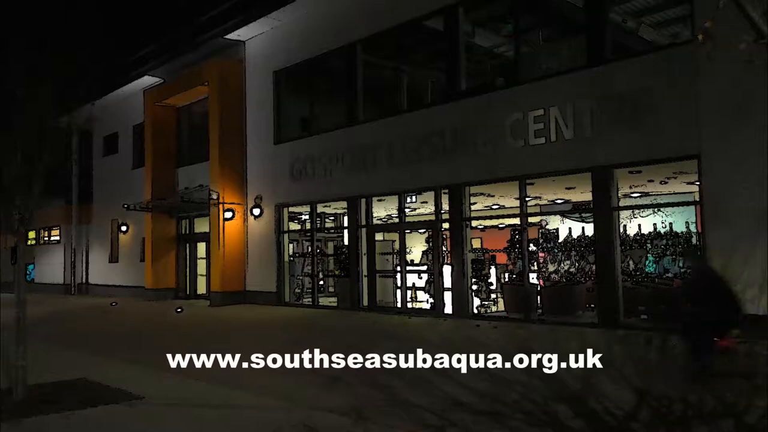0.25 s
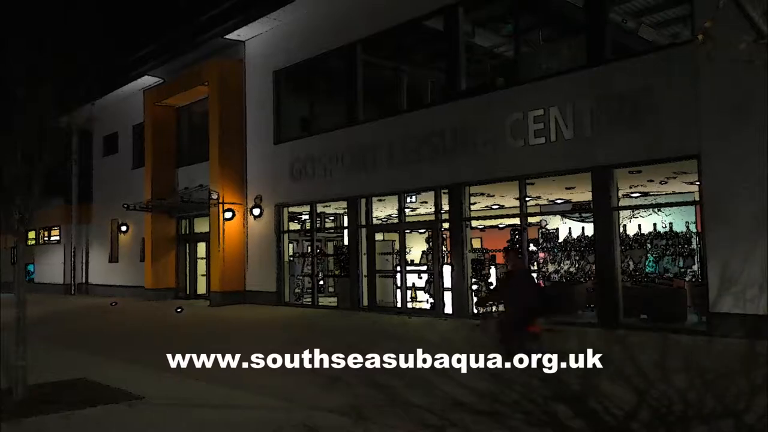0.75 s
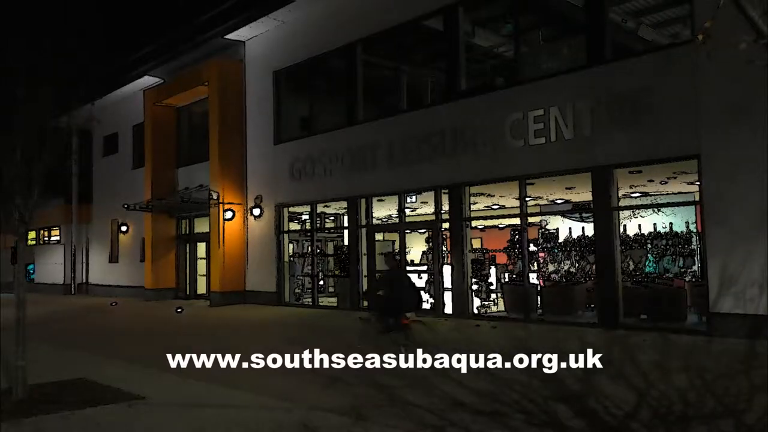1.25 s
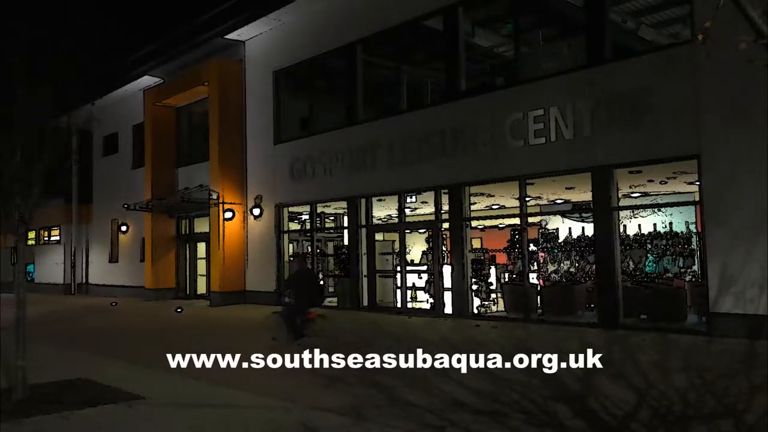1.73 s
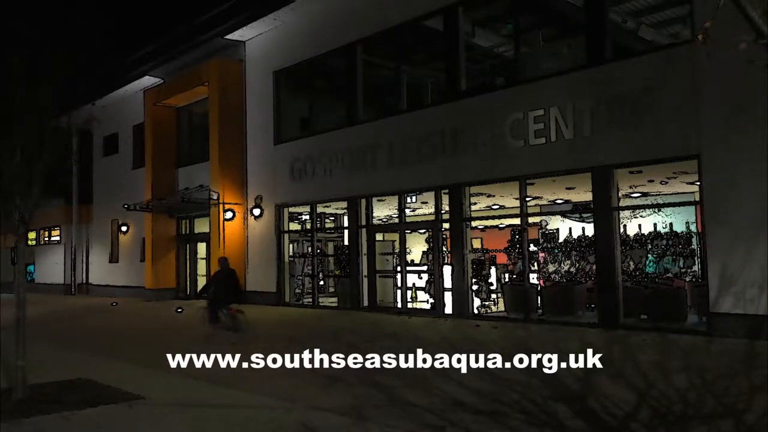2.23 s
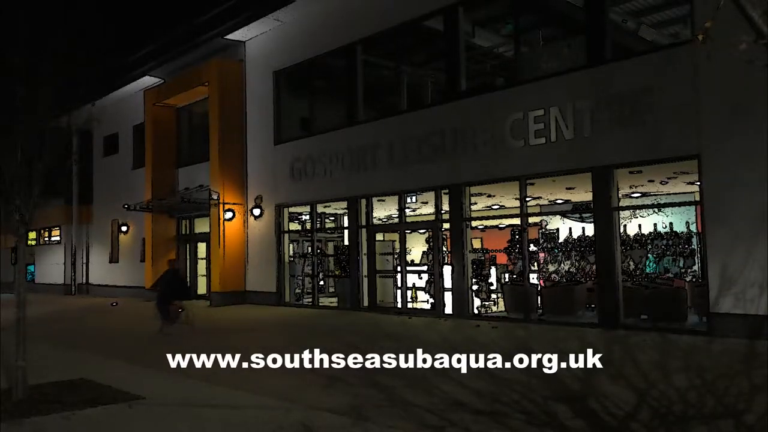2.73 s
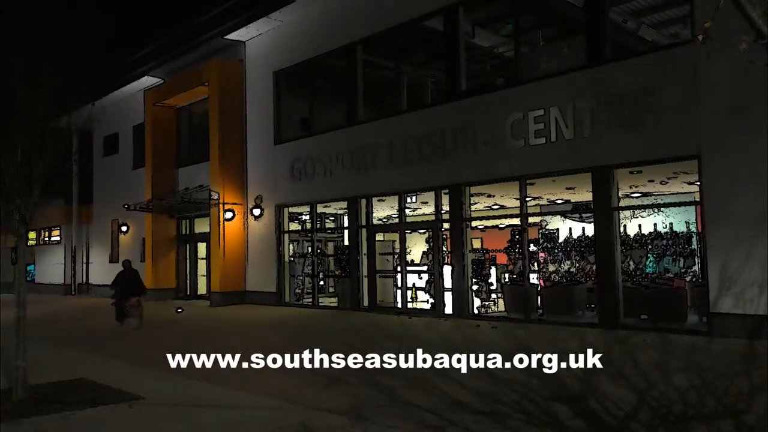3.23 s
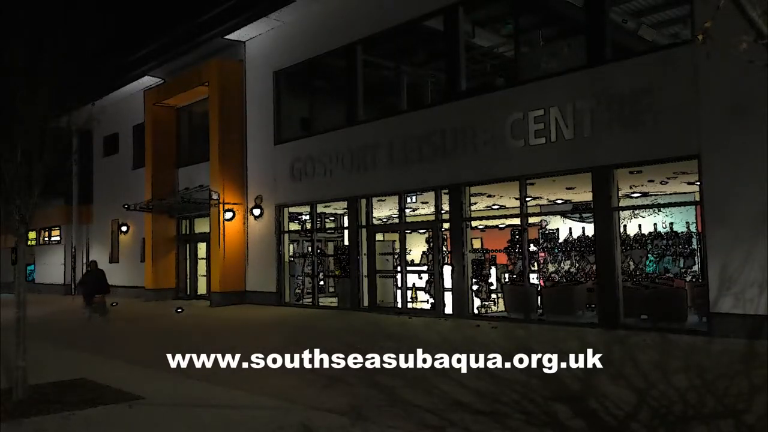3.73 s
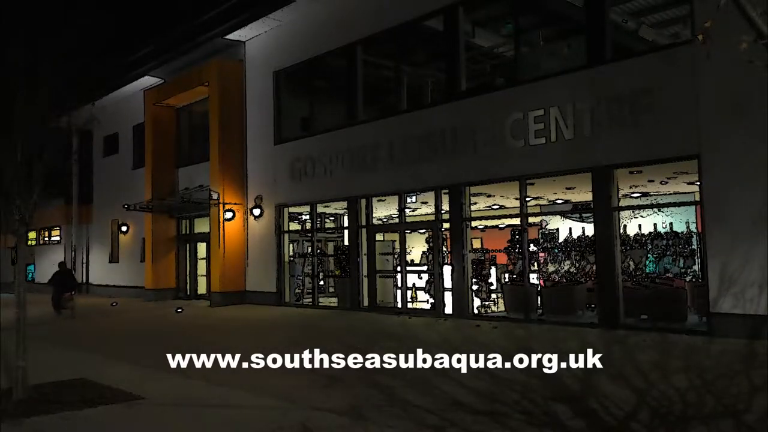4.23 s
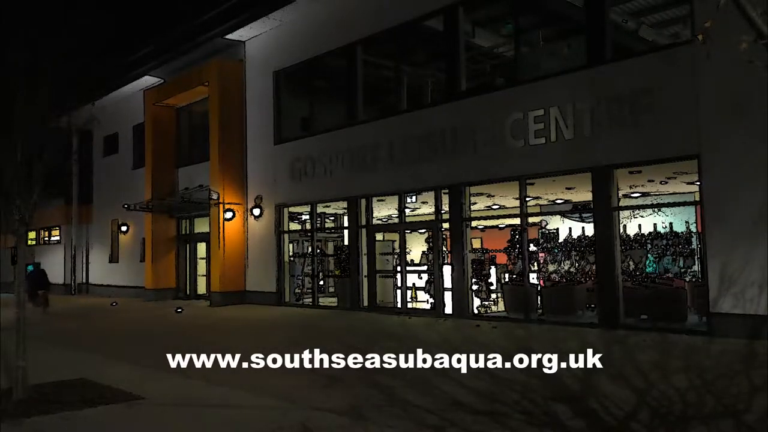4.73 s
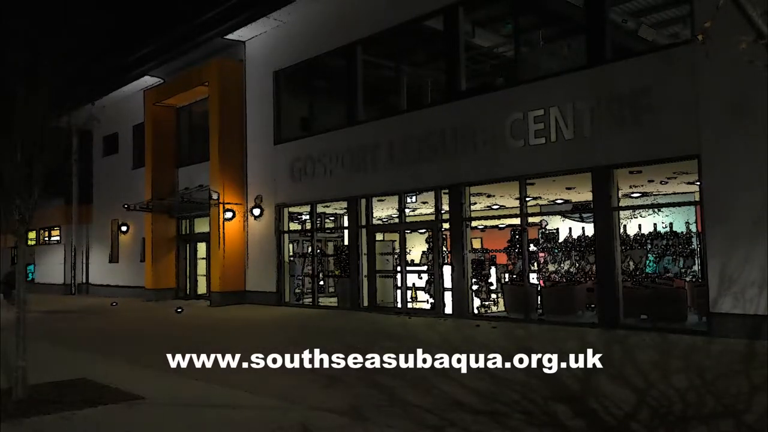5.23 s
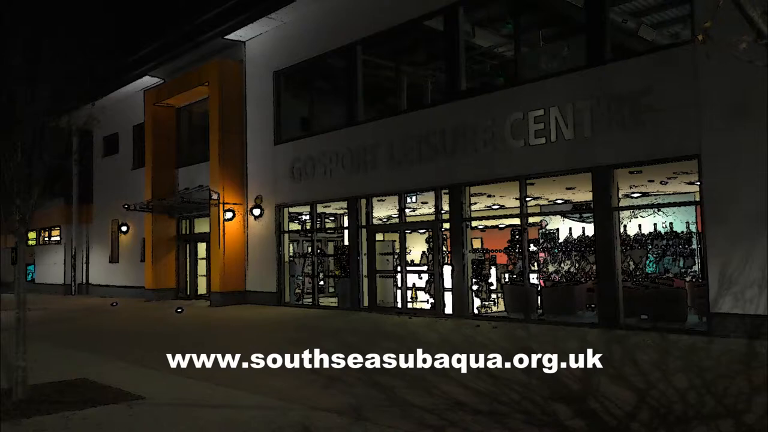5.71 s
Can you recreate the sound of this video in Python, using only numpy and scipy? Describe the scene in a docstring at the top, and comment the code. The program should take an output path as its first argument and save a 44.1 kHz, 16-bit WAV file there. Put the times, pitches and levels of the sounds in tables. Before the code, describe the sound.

A stationary stereo microphone hears a low, broad wash of far road noise and light breeze. A bicycle goes by several metres away, its brakes giving thin whistling squeals at the start, sharp chirps around one and a half seconds, and a fluttering cluster near three. Fainter squeaks and freewheel clicks follow, then a small tick and soft rub, with short reflections from the building.

```python
"""Bicycle passing on a forecourt at night

A bicycle rolls past and away on paving beside a building. Its tyres hiss as shaped noise, its freewheel
ticks as a train of ringing impulses, and its dragging brakes squeal as wavering sines and judder; discrete
echoes and a scattered tail stand for the facade. A distant road, a light breeze and night air are stereo
noises with their own spectra. Near the end comes one short, bright swish of noise."""
import sys
import numpy as np
from scipy import signal
from scipy.fft import rfft, irfft, next_fast_len
from scipy.io import wavfile

SR = 44100
rng = np.random.default_rng(int(sys.argv[2]) if len(sys.argv) > 2 else 0)


def generate_wav(signal):
    """Clip the signal to [-1, 1] and save it as 16-bit WAV at the path in sys.argv[1]."""
    frames = np.transpose(np.atleast_2d(signal))
    scaled = np.clip(frames, -1, 1) * 32767
    pcm = np.round(scaled).astype(np.int16)
    wavfile.write(sys.argv[1], SR, pcm)


N = 263277
TIME = np.arange(N) / SR

# Brake squeals: t/s, hold/s, f/Hz, level/dB, initial flatness/Hz (negative: sharp), left minus right/dB
SQUEALS = [(0, .06, 12120, -60, -7, 0), (0, 0.064, 13900, -60, 0, 0), (0.024, .23, 10690, -54.5, -3, 0),
           (.1, .08, 7760, -69, -5, 3), (.37, .26, 10600, -50, -3, 0), (.415, .22, 7760, -59.5, 0, 4),
           (.405, .05, 2790, -60, 1, 7), (.48, .19, 2830, -58.5, -3, 4), (1.565, 0.033, 8670, -43, 5, -4.5),
           (1.632, 0.042, 8540, -38.5, -2, -3), (1.675, 0.085, 8640, -49, -0.5, -3),
           (1.905, .19, 9320, -70.5, 1, 2), (2.26, 0.021, 9360, -55, -9, -1),
           (2.538, 0.032, 14460, -50, 0, -4.5), (2.545, 0.031, 15730, -56, 0, -4.5),
           (2.622, 0.12, 11860, -43, 0.5, 0.5), (2.765, 0.031, 11880, -50, 0, -1),
           (2.752, 0.026, 3400, -64.5, -5, 4), (2.77, 0.028, 4230, -61.5, -6, 0),
           (2.772, 0.1, 7950, -64.5, 500, 5), (2.875, 0.059, 8600, -60.5, 2, -2),
           (2.91, 0.039, 6420, -61, 0, 0), (2.985, .04, 8450, -62, 3, 2), (2.985, 0.027, 6280, -67, 0, 0),
           (3.08, 0.018, 5780, -68, 2, 0), (3.1, 0.023, 9300, -69, 0, 0), (2.755, .19, 13860, -63, -3, 1),
           (2.945, 0.23, 13780, -59.5, -3, -2), (2.965, 0.34, 15620, -70, 0, -3),
           (3.135, 0.089, 11890, -56, -4, 1), (3.194, 0.062, 11870, -44, -4, -2),
           (3.35, 0.058, 11905, -45, 3, 0), (3.205, 0.023, 5980, -68, 5, 0),
           (3.205, 0.13, 15300, -60, 2, -3), (3.255, 0.11, 13700, -54, -2, -1),
           (3.3, .07, 14230, -57, 0, -1), (4.288, .38, 9060, -53.5, 600, -4.5),
           (4.49, 0.12, 10100, -80, 3, -5), (4.63, 0.034, 8720, -68.5, -6, -4),
           (4.695, 0.036, 8700, -69, 0, -5), (4.85, 0.092, 10730, -73.5, -2, -1),
           (5.038, 0.088, 8780, -66.5, -3.5, -5), (5.105, .08, 9600, -61.5, 902, -4),
           (5.155, 0.19, 10170, -63, 2, -5), (5.32, .09, 10400, -73, 0, -5)]
# Flurries of chirps as the pad skips: t/s, length/s, lowest f/Hz, highest f/Hz, rate/s^-1, level/dB
FLURRIES = [(2.779, 0.23, 5590, 9600, 85, -65), (2.8, .62, 13800, 15800, 60, -71)]
# Spectrum of the bicycle's tyre hiss: f/Hz, relative density/dB
TYRE_HISS_SPECTRUM = [(600, -9.5), (1400, -4), (1800, 1), (2150, 2), (2550, -5.5), (2950, -7), (3500, -7.5),
                      (4500, -13), (5100, -18.5), (6200, -13), (7800, -20.5), (10300, -18), (15500, -42)]
# Small sharp ticks: t/s, level/dB, centre f/Hz
TICKS = [(.24, -40, 9000), (.485, -39, 14000), (.712, -45, 7000), (1.859, -39, 4180), (5.731, -45, 8000)]
# Reflections from paving and facade, relative to the direct sound: delay t/s, level/dB
ECHOES = [(.0043, -19), (.023, -7.5), (.037, -14.5)]
# The swish, a quick stroke within a soft, longer rub: t/s, half width/s, level/dB
SWISH_STROKES = [(5.686, 0.013, -57.5), (5.705, 0.059, -64)]
# Spectrum of the swish: f/Hz, relative density/dB
SWISH_SPECTRUM = [(2000, -8), (4000, -5), (6000, -6), (8000, -4), (11000, 2), (14000, 2), (16000, -2)]
# Distant road, before the layer gains below: t/s, engine rumble level/dB, tyre roar level/dB
ROAD_LEVELS = [(0.0, -52.5, -50.5), (1.0, -51.5, -52), (1.76, -53.5, -51), (2.28, -54.5, -55),
               (3.22, -56.5, -55.5), (3.97, -55.5, -55), (4.21, -55, -56), (5.5, -54, -55),
               (5.65, -53.5, -53.5), (5.97, -58, -56)]
# Spectrum of the engine rumble: f/Hz, relative density/dB
RUMBLE_SPECTRUM = [(20, -21), (45, -9.5), (70, -4.5), (110, -1), (160, 0.5), (220, -2), (300, -4.5),
                   (410, -11.5), (600, -21.5)]
# Spectrum of the distant tyre roar: f/Hz, relative density/dB
ROAR_SPECTRUM = [(350, -8.5), (500, -7), (750, -6), (900, -5), (1100, 0), (1450, 0.5), (1900, -4),
                 (2200, -10), (2500, -16), (2850, -14.5), (3300, -18), (4200, -23.5), (4600, -22),
                 (5100, -29.5)]
# Puffs of a light breeze: t/s, half width/s, level/dB
PUFFS = [(.3, 0.65, -62), (1.23, 0.12, -53.5), (1.65, 0.27, -58), (4.6, .15, -62), (5.17, .04, -59),
         (5.87, .1, -60)]
# Spectrum of the breeze's buffeting: f/Hz, relative density/dB
BUFFET_SPECTRUM = [(20, -12), (40, -9.5), (65, -0.5), (95, -4.5), (150, -10)]
# Spectrum of the night air: f/Hz, relative density/dB
AIR_SPECTRUM = [(4500, 4.5), (6300, -1), (8000, -5), (11000, 0.6), (15500, 1)]
# Correlation of the two ears, limited to 1 in use: f/Hz, likeness
EAR_LIKENESS = [(40, 0.7), (130, 0.83), (500, 0.66), (1200, 0.67), (1800, 0.78), (2200, 0.24), (2700, 0),
                (3300, 0.56), (4500, 0.68), (8000, 1.2)]
# Stereo balance, of which each noise takes a share: f/Hz, left minus right/dB
EAR_LEAN = [(60, -4.5), (130, -3.5), (290, -1), (640, 1.5), (1410, 0.5), (3100, 6.5), (6820, -5.5),
            (15000, -2)]

# The bicycle passes in a straight line and slows as its brakes drag
PASS_S, NEAREST_M, SPEED_M_PER_S, SLOWING_M_PER_S2 = 0.6, 6.3, 4.2, 0.18
HISS_DB, HISS_DB_PER_M_PER_S = -55, 4.5  # at the nearest point, and growth with speed
SQUEAL_ATTACK_S, SQUEAL_SAG_DB_PER_S, SQUEAL_RELEASE_DB_PER_S = 0.023, 20, 450
SQUEAL_GLIDE_S = 0.18  # time to reach the mode's pitch
# Pitch shake at first, its later limit, and the time constant between; both scale with pitch
WAVER_HZ, WAVER_FAR_HZ, WAVER_SETTLE_S, WAVER_AT_HZ = 85, 22, 1.74, 10000
JUDDER_S, JUDDER_ATTACK_S, JUDDER_HOLD_S = 2.75, 0.067, 0.23
JUDDER_DB, JUDDER_RELEASE_DB_PER_S = -63, 160
CHIRP_S, CHIRP_SPREAD_DB, CHIRP_SLIDE_HZ_PER_S = 0.034, 2.5, 5400
CLICKS_PER_M, FREEWHEEL_DB = 6.2, -86.5
FREEWHEEL_SWELL_S, FREEWHEEL_SWELL_HALF_WIDTH_S, FREEWHEEL_SWELL_DB = 4.99, 0.52, 12.7
RUMBLE_GAIN_DB, ROAR_GAIN_DB = 1.5, 2.5
DULL_S, DULL_HALF_WIDTH_S, DULL_SHARE = 5.8, 0.17, 0.65  # the roar's upper edge dips by this share
BREEZE_DB = -67  # between puffs
CUTOFF_HZ = 15900


def brake_tone(hz, waver_hz, flutter_db):
    """Friction-driven oscillation: one mode sings while uneven grip shakes its pitch and strength."""
    shake = drift(130, size=SR)[:len(hz)]
    flutter = drift(35, size=SR)[:len(hz)]
    phase = 2 * np.pi * np.cumsum(hz + waver_hz * shake) / SR
    return np.sqrt(2) * np.sin(phase) * from_db(flutter_db * flutter)


def brakes():
    """Self-excited squeal: each mode catches, sags and rings out; later ones keep steadier pitch."""
    out, t = np.zeros((2, N)), TIME[:SR // 2]
    for start, hold_s, hz, db, flat_hz, lean_db in SQUEALS:
        pitch = hz - flat_hz * np.maximum(1 - t / SQUEAL_GLIDE_S, 0)
        waver_hz = WAVER_FAR_HZ + (WAVER_HZ - WAVER_FAR_HZ) * np.exp(-start / WAVER_SETTLE_S)
        tone = brake_tone(pitch, waver_hz * hz / WAVER_AT_HZ, flutter_db=2.0)
        shape = envelope(t, SQUEAL_ATTACK_S, hold_s, SQUEAL_RELEASE_DB_PER_S)
        level = from_db(db - SQUEAL_SAG_DB_PER_S * t) * shape
        for ear, gain in zip(out, pan(lean_db)):
            add(ear, start, gain * level * tone)
    return out


def judder(slips_hz=660, jitter=0.03, low_hz=5800, high_hz=8600):
    """Stick-slip: uneven slips of the pad knock the rim's high modes, here harmonics 8 to 14."""
    out, t = np.zeros(N), TIME[:SR // 2]
    slip_rate = slips_hz * (1 + jitter * drift(200, size=len(t)))
    phase = 2 * np.pi * np.cumsum(slip_rate) / SR
    slips = np.zeros(len(t))
    for k in range(8, 15):
        slips += np.sin(k * phase) * from_db(3.9 * drift(40, size=len(t)))
    level = from_db(JUDDER_DB) * envelope(t, JUDDER_ATTACK_S, JUDDER_HOLD_S, JUDDER_RELEASE_DB_PER_S)
    add(out, JUDDER_S, level * rms_one(band(slips, low_hz, high_hz)))
    return out


def chirps():
    """Transient mode excitation: the skipping pad sounds one brief, slightly sliding mode after another."""
    out, t = np.zeros(N), np.arange(0, CHIRP_S, 1 / SR)
    shape = np.sin(np.pi * t / CHIRP_S) ** 2
    for start, length_s, low_hz, high_hz, per_s, db in FLURRIES:
        for k in range(round(per_s * length_s)):
            when, mode = rng.random(2)
            slide, strength = rng.standard_normal(2)
            hz = low_hz + (high_hz - low_hz) * mode + CHIRP_SLIDE_HZ_PER_S * slide * t
            tone = np.sqrt(2) * np.sin(2 * np.pi * np.cumsum(hz) / SR)
            level = from_db(db + CHIRP_SPREAD_DB * strength)
            add(out, start + (k + when) / per_s, level * shape * tone)
    return out


def ride():
    """Uniform deceleration on a straight line: the bicycle's speed (m/s) and distance (m)."""
    speed = SPEED_M_PER_S - SLOWING_M_PER_S2 * (TIME - PASS_S)
    along = (speed + SPEED_M_PER_S) / 2 * (TIME - PASS_S)
    return speed, np.hypot(along, NEAREST_M)


def tyres():
    """Rolling noise: the hiss grows with speed and its pressure varies inversely with distance."""
    speed, distance = ride()
    level_db = HISS_DB + HISS_DB_PER_M_PER_S * (speed - SPEED_M_PER_S) + 1.2 * drift(22)
    return from_db(level_db) * NEAREST_M / distance * wash(TYRE_HISS_SPECTRUM, lean_share=0.59)


def freewheel(ring_hz=4520, width_hz=220, decay_s=0.0089):
    """Impulsive excitation: the pawl drops over each tooth and rings briefly, at a rate set by speed."""
    clicks_per_s = CLICKS_PER_M * ride()[0]
    teeth_passed = np.cumsum(clicks_per_s * (1 + 0.06 * drift(5))) / SR
    since_click_s = teeth_passed % 1 / clicks_per_s
    clicks = rng.standard_normal(N) * np.exp(-since_click_s / decay_s)
    ringing = rms_one(band(clicks, ring_hz - width_hz / 2, ring_hz + width_hz / 2))
    more_db = FREEWHEEL_SWELL_DB * swell(FREEWHEEL_SWELL_S, FREEWHEEL_SWELL_HALF_WIDTH_S)
    return from_db(FREEWHEEL_DB + more_db) * ringing


def ticks(decay_s=0.0044):
    """Damped impulse: each tick is a quickly dying noise burst about an octave wide."""
    out, t = np.zeros(N), TIME[:SR // 10]
    for start, db, hz in TICKS:
        burst = band(rng.standard_normal(len(t)), hz * 0.7, hz * 1.35)
        add(out, start, from_db(db) * burst / np.abs(burst).max() * np.exp(-t / decay_s))
    return out


def grit(per_s=80, level_db=-65.0, fade_db_per_s=-6.0, spread_db=1.5, decay_s=0.0017):
    """Random impulses: grains snap under the tyres, fainter as the bicycle draws away."""
    sizes = from_db(spread_db * np.minimum(rng.exponential(1, N), 3))
    impulses = sizes * (rng.random(N) < per_s / SR)
    decaying = signal.lfilter([1], [1, -np.exp(-1 / (decay_s * SR))], impulses + 1e-18)
    snaps = decaying * rng.standard_normal(N)
    return from_db(level_db + fade_db_per_s * TIME) * rms_one(band(snaps, 7500, 13500))


def forecourt(x, t60, wet_db):
    """Reflection and reverberation: a few hard echoes and a short scattered tail, with unit energy."""
    t = TIME[:SR // 2]
    tail = rng.standard_normal(len(t)) * from_db(-60 * t / t60)
    response = from_db(wet_db) * rms_one(tail) / np.sqrt(len(t))
    response[0] = 1  # direct sound
    for delay, db in ECHOES:
        response[round(delay * SR)] += from_db(db)
    return signal.fftconvolve(x, [response / np.linalg.norm(response)])[:, :N]


def swish():
    """Amplitude-modulated noise: a short, grainy rub that swells and dies."""
    grain = from_db(3.0 * drift(200))
    return swells(SWISH_STROKES) * grain * wash(SWISH_SPECTRUM, lean_share=0.29)


def road(edge_low_hz=1200, edge_high_hz=2200):
    """Superposition of noises: far engines rumble under the roar of tyres on asphalt."""
    rumble_db, roar_db = in_time(ROAD_LEVELS)
    rumble_gain = from_db(rumble_db + RUMBLE_GAIN_DB + 0.55 * drift(3.8))
    rumble = rumble_gain * wash(RUMBLE_SPECTRUM, lean_share=0.97)
    roar_gain = from_db(roar_db + ROAR_GAIN_DB + 0.44 * drift(11.5))
    roar = roar_gain * wash(ROAR_SPECTRUM, lean_share=0.55)
    edge_filter = signal.butter(2, [edge_low_hz, edge_high_hz], "band", fs=SR, output="sos")
    edge = signal.sosfiltfilt(edge_filter, roar)  # zero phase, so that it subtracts cleanly
    return rumble + roar - DULL_SHARE * swell(DULL_S, DULL_HALF_WIDTH_S) * edge


def breeze():
    """Low-frequency pressure fluctuation: soft buffeting that comes in puffs."""
    return (from_db(BREEZE_DB) + swells(PUFFS)) * wash(BUFFET_SPECTRUM, lean_share=0.2)


def night_air():
    """Stationary noise: a faint, steady high hiss."""
    return from_db(-75.0) * wash(AIR_SPECTRUM, lean_share=0.53)


def wash(spectrum, lean_share):
    """Partial coherence: coloured stereo noise, the ears more or less alike at each frequency; rms 1."""
    size = next_fast_len(N, True)
    hz = np.arange(1, size // 2 + 2) * SR / size
    # The spectrum falls away over an octave beyond either end
    closed = [(spectrum[0][0] / 2, -50), *spectrum, (spectrum[-1][0] * 2, -70)]
    mid, side = rfft(rng.standard_normal((2, size)))
    alike = np.clip(at_hz(EAR_LIKENESS, hz), -1, 1)
    ears = np.sqrt(1 + alike) * mid + np.sqrt(1 - alike) * side * [[1], [-1]]
    coloured = ears * from_db(at_hz(closed, hz)) * pan(lean_share * at_hz(EAR_LEAN, hz))
    return rms_one(irfft(coloured, size)[:, :N])


def drift(rate_hz, size=N):
    """Low-passed chance: two equal poles at rate_hz, run at every 40th sample; spread about 1."""
    step, settle = 40, 2000
    r = np.exp(-2 * np.pi * rate_hz * step / SR)
    slow = signal.lfilter([1], [1, -2 * r, r * r], rng.standard_normal(size // step + settle + 2))
    settled = rms_one(slow)[settle:]
    return np.interp(np.arange(size) / step, np.arange(len(settled)), settled)


def band(x, low_hz, high_hz):
    """Band limitation: a gentle band-pass."""
    edges = [low_hz, min(high_hz, SR / 2 - 1000)]
    return signal.sosfilt(signal.butter(2, edges, "band", fs=SR, output="sos"), x)


def envelope(t, attack_s, hold_s, release_db_per_s):
    """Growth and decay: rises smoothly from time zero; exponential decay begins at hold_s."""
    attack = np.sin(np.pi / 2 * np.clip(t / attack_s, 0, 1)) ** 2
    return attack * from_db(-release_db_per_s * np.maximum(t - hold_s, 0))


def swell(at_s, half_width_s):
    """Gaussian pulse: a smooth rise and fall of height 1."""
    return np.exp(-((TIME - at_s) / half_width_s) ** 2)


def swells(rows):
    """Superposition of Gaussian gains from rows of t/s, half width/s, level/dB."""
    return sum(from_db(db) * swell(at_s, half_width_s) for at_s, half_width_s, db in rows)


def pan(lean_db):
    """Interaural level difference: left and right gains."""
    return from_db(lean_db / 2 * np.array([[1], [-1]]))


def add(out, start, sound):
    """Superposition: mix a sound in from its start time."""
    at = max(round(start * SR), 0)
    out[at:at + len(sound)] += sound[:N - at]


def in_time(rows):
    """Linear interpolation: each column of a table as a curve in time."""
    t, *columns = np.transpose(rows)
    return [np.interp(TIME, t, column) for column in columns]


def at_hz(points, hz):
    """Logarithmic pitch scale: a spectrum interpolated on a log-frequency axis."""
    f, values = np.transpose(points)
    return np.interp(np.log(hz), np.log(f), values)


def from_db(db):
    """Decibel definition: amplitude ratio from level."""
    return 10 ** (np.asarray(db) / 20)


def rms_one(x):
    """Power normalisation: scale to rms 1."""
    return x / np.sqrt(np.mean(x ** 2) + 1e-20)


def scene():
    """Superposition: the bicycle before the facade, with road, breeze and night air all round."""
    direct = brakes() + judder() + freewheel() + ticks() + grit()
    bicycle = forecourt(direct, t60=0.47, wet_db=-8.0)
    # A second tail, of opposite sign at the two ears, makes them differ
    spread = from_db(-17.0) * forecourt(direct, t60=0.31, wet_db=19) * [[1], [-1]]
    return bicycle + spread + chirps() + tyres() + swish() + road() + breeze() + night_air()


def record(dry):
    """Low-pass filtering: an elliptic filter cuts the top steeply."""
    return signal.sosfilt(signal.ellip(12, 0.1, 80, CUTOFF_HZ, fs=SR, output="sos"), dry)


dry = scene()
out = record(dry)
generate_wav(out)
```